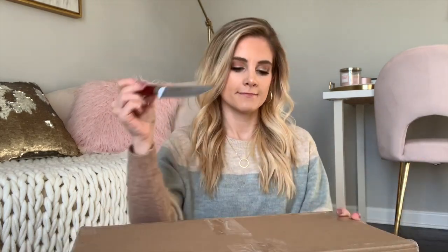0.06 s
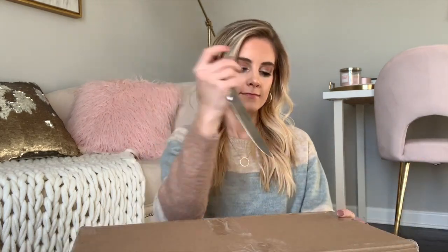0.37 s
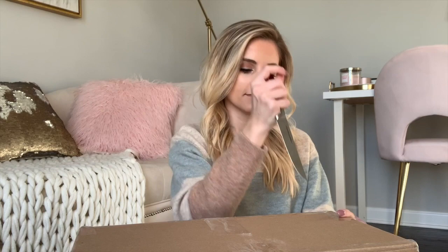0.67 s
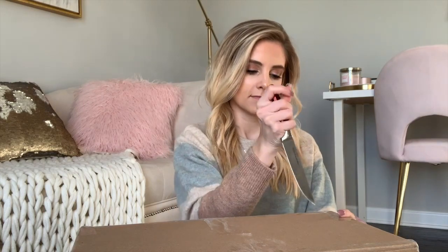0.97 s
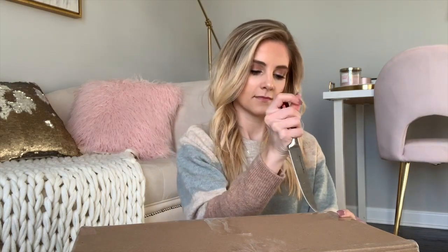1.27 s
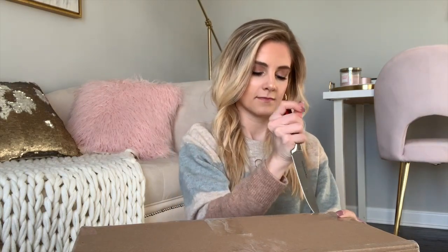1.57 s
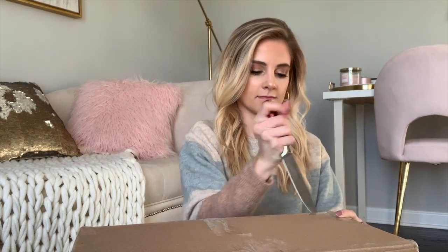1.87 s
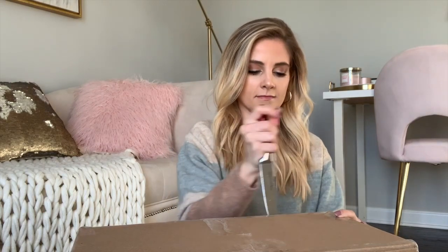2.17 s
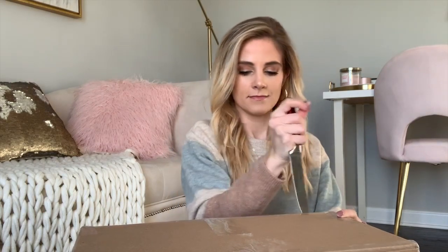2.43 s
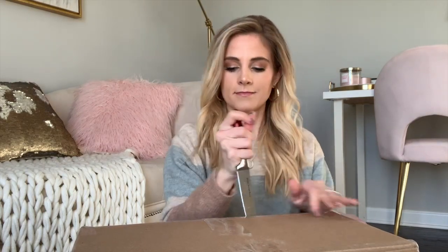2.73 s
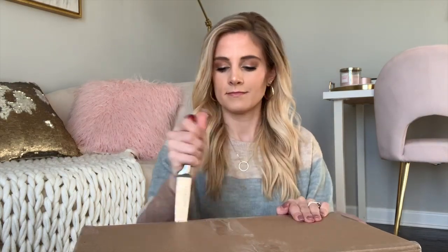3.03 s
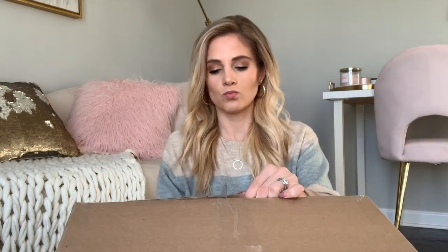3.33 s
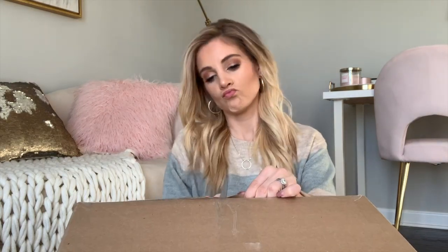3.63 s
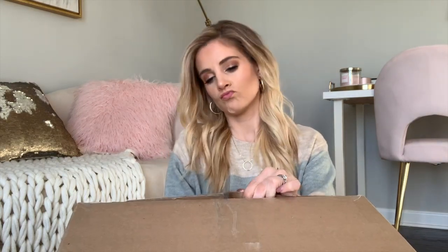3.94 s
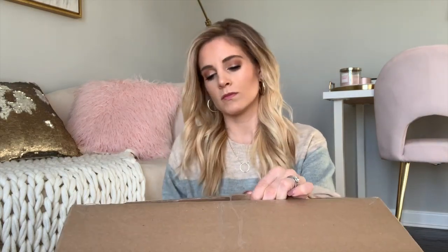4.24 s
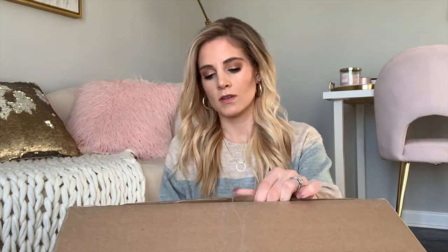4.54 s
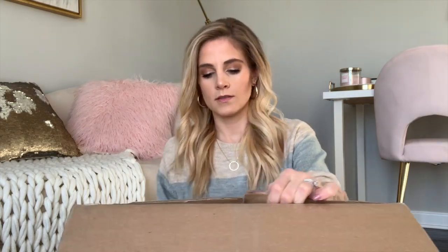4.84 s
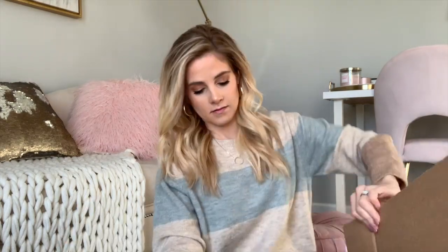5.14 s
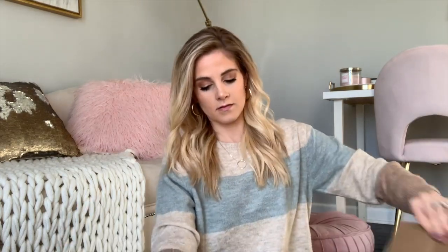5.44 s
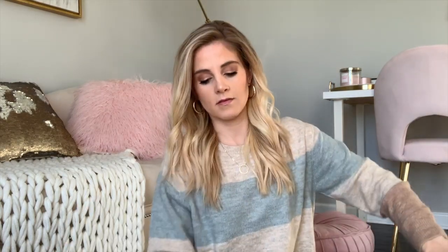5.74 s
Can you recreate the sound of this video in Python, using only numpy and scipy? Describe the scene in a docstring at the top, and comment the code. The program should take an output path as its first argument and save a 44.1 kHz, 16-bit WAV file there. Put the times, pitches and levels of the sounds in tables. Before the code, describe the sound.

Close up in a quiet room, a knife tip knocks irregularly on a hollow cardboard box and scratches at its tape. It punches in with a bright crack, and a moment later comes a loud double pop of tape and cardboard. Softer rubbing and hissing scrapes follow, until the box drops with a deep thump and is scraped aside. The house rumbles faintly underneath.

```python
"""A kitchen knife taps, stabs and slits the packing tape of a large cardboard box in a living room.
The box is tipped over, its flaps are rubbed and pulled, and it is dropped and shoved aside.
Blows send bending waves through the panels and ring the hollow box; tape and blade tip snap.
Each stroke is a shower of tiny slips that swells, holds and lifts. The house rumbles faintly."""
import sys
import numpy as np
from scipy import signal
from scipy.fft import rfft, irfft
from scipy.io import wavfile
from scipy.ndimage import uniform_filter1d, map_coordinates

SR = 44100
rng = np.random.default_rng(int(sys.argv[2]) if len(sys.argv) > 2 else 0)


def int16_out(signal):
    """Quantize to a 16-bit WAV file."""
    q = np.round(np.clip(np.atleast_2d(signal).T, -1, 1) * 32767)
    wavfile.write(sys.argv[1], SR, q.astype(np.int16))


N = 260228
TIME = np.arange(N) / SR

# friction spectra of board rasp, tape hiss and panel drumming: freq_hz, level_db
BOARD_RASP = [(200, -38.5), (450, -3.5), (620, 6), (780, 4), (950, 7), (1120, 4.5), (1650, 0.5),
              (2100, -3.5), (3000, -7), (4500, -2.5), (9000, -24)]
TAPE_HISS = [(1200, -40), (2200, -4.5), (3200, 4.5), (4200, 2), (5500, 2.5), (7500, 4), (9600, 4),
             (12000, -4.5), (15300, -2.5), (17000, -7.5)]
PANEL_DRUM = [(40, 2), (100, 7), (170, 3.5), (260, 2), (330, -2.5), (450, -3), (580, -11.5), (900, -36.5),
              (2500, -71.5)]


def gain_of(db):
    """dB to amplitude."""
    return 10 ** (np.asarray(db) / 20)


def unit_rms(x):
    """Scale to rms 1."""
    return x / np.sqrt(np.mean(x ** 2) + 1e-20)


def unit_energy(x):
    """Scale to energy 1."""
    return x / np.linalg.norm(x)


def curve_at(points, hz):
    """Interpolate over log frequency."""
    freq_hz, value = np.transpose(points)
    return np.interp(np.log(hz + 1), np.log(freq_hz + 1), value)


def add(mix, start_s, sound):
    """Mix in at start_s."""
    part = mix[max(round(start_s * SR), 0):][:len(sound)]
    part += sound[:len(part)]


def coloured(x, spectrum, size=2048):
    """Minimum-phase filter: nothing sounds ahead of a click."""
    log_gain = np.log(gain_of(curve_at(spectrum, abs(np.fft.fftfreq(size, 1 / SR)))))
    taps = np.fft.ifft(np.exp(np.conj(signal.hilbert(log_gain)))).real
    return signal.oaconvolve(x, taps[:size // 2])[:len(x)]


def resonate(x, hz, width_hz):
    """Two-pole resonance."""
    hz = min(hz, SR / 3)
    return signal.lfilter(*signal.iirpeak(hz, hz / min(width_hz, SR / 4), fs=SR), x)


def gesture(t, rise_s, hold_s, swell_db, fall_db_per_s, sag_db_per_s=14):
    """Contact envelope: swell, sagging hold, fall."""
    db = -swell_db * np.maximum(1 - t / rise_s, 0) - sag_db_per_s * np.clip(t - rise_s, 0, hold_s)
    return gain_of(db - fall_db_per_s * np.maximum(t - rise_s - hold_s, 0))


def slips(per_s, spread_db, smooth):
    """Friction: random slips of uneven size over a smooth rub."""
    sizes = gain_of(spread_db * np.minimum(rng.exponential(1, N), 4))
    clicks = sizes * rng.choice([-1, 1], N) * (rng.random(N) < per_s / SR)
    return unit_rms(unit_rms(clicks) + smooth * rng.standard_normal(N))


def board_echoes(x, size=512, places=7, decay_s=0.0027, echo_db=-1, dwell_s=0.06):
    """The contact moves from place to place; echoes in the board give each its own resonances."""
    t, out = np.arange(size) / SR, x.copy()
    for place in range(places):
        echoes = gain_of(echo_db) * unit_energy(rng.standard_normal(size) * np.exp(-t / decay_s))
        nearness = np.sin(np.pi / 2 * np.minimum((TIME / dwell_s - place) % places, 2))
        out += signal.oaconvolve(x * nearness, echoes)[:N]
    return out


def scraping(catch_db=1.5):
    """Slips rasp in the board, hiss on the tape and drum on the panels."""
    # blade or hand strokes: start_s, rise_s, hold_s, rasp_db, hiss_re_rasp_db, drum_re_rasp_db
    strokes = [(0.0, 0.01, 0.29, -69.5, 2, -0.5), (1.527, 0.0062, 0.044, -43, 3, 6.5),
               (1.733, 0.022, .015, -64, 0.5, -2), (1.857, 0.049, 0.14, -56, 1.5, 6),
               (1.976, 0.011, 0.0039, -35, 8.5, -3), (2.007, 0.021, 0.062, -46.5, -4, 0.5),
               (2.212, 0.036, 0.06, -44, 0.5, 4), (2.397, 0.0074, 0.013, -63.5, 6.5, 11.5),
               (2.546, 0.012, 0.12, -47.5, 0.5, 5), (2.73, 0.038, 0.0033, -47, -11, -8),
               (2.893, 0.0093, 0.033, -47.5, -8, -26), (2.961, 0.0096, 0.004, -37, 3, 8),
               (3.011, 0.012, 0.022, -34.5, 2.5, 8.5), (3.054, 0.0062, 0.075, -52.5, -1, 8.5),
               (3.133, 0.012, 0.15, -74.5, 13, 3), (3.386, .12, 0.16, -59.5, 2.5, 5),
               (3.799, 0.03, 0.037, -38, 5, 1.5), (3.872, 0.015, .13, -53.5, 0.5, 4),
               (4.034, 0.13, 0.058, -45.5, 2.5, 2.5), (4.207, 0.02, 0.14, -52, 1, 7.5),
               (4.41, 0.049, 0.047, -57, -1, 4.5), (4.597, 0.017, 0.14, -64, -25, 15),
               (4.746, 0.047, 0.067, -59, 1.5, 6.5), (4.933, 0.017, 0.0073, -59.5, 3.5, -12),
               (5.074, .018, 0.016, -35, -7.5, -10), (5.114, 0.023, 0.37, -49, 2, 1.5),
               (5.475, 0.042, 0.03, -49, 6, 0), (5.56, 0.011, 0.14, -42.5, -6, -0.5),
               (5.769, 0.058, 0.029, -37, -11, -6.5)]
    catches = unit_rms(uniform_filter1d(rng.standard_normal(N), size=300))
    drive = board_echoes(slips(per_s=2500, spread_db=1.0, smooth=0.5) * gain_of(catch_db * catches))
    levels, t = np.zeros((3, N)), np.arange(SR) / SR
    for start_s, rise_s, hold_s, rasp_db, hiss_db, drum_db in strokes:
        pressure = gain_of(rasp_db) * gesture(t, rise_s, hold_s, swell_db=17, fall_db_per_s=601.5)
        for level, db in zip(levels, (0, hiss_db, drum_db)):
            add(level, start_s, gain_of(db) * pressure)
    levels = uniform_filter1d(levels, size=150, axis=1)
    tape_drive = np.roll(drive, SR)  # the tape slips on its own
    layers = zip(levels, (drive, tape_drive, drive), (BOARD_RASP, TAPE_HISS, PANEL_DRUM))
    return sum(level * unit_rms(coloured(x, spectrum)) for level, x, spectrum in layers)


def diffuse_noise(size):
    """Noise at two close microphones, alike in the bass."""
    # left-right likeness: freq_hz, correlation
    likeness = [(100, 0.97), (300, 0.87), (600, 0.53), (1200, 0.075), (3000, 0.24), (15000, 0.14)]
    a, b = rfft(rng.standard_normal((2, size)))
    correlation = np.clip(curve_at(likeness, np.fft.rfftfreq(size, 1 / SR)), -1, 1)
    mid = np.sqrt((1 + correlation) / 2) * a
    side = np.sqrt((1 - correlation) / 2) * b
    return irfft([mid + side, mid - side], size)


def house_rumble(level_db=-50):
    """Low steady noise of the house."""
    # background spectrum: freq_hz, level_db
    spectrum = [(20, -4), (30, -1.5), (42, -4), (58, 2.5), (85, -2.5), (115, -5.5), (160, -15),
                (250, -28.5), (500, -41), (1000, -47.5), (3000, -55.5), (9000, -56.5), (16000, -57)]
    gain = gain_of(curve_at(spectrum, np.fft.rfftfreq(N, 1 / SR)))
    return gain_of(level_db) * unit_rms(irfft(rfft(diffuse_noise(N)) * gain, N))


def rubs(stage_q=2.6):
    """Slips feed one resonance of the blade or a flap as the contact swells and lets go."""
    # rubbing contacts: middle_s, length_s, peak_rms_db, pitch_hz
    contacts = [(0.154, 0.24, -74, 1390), (1.197, .018, -45.5, 747), (1.542, 0.078, -45, 1500),
                (1.561, 0.057, -49, 5000), (1.56, 0.081, -42, 8050), (2.027, 0.06, -67, 1480),
                (1.916, 0.14, -53.5, 7500), (2.275, .097, -42.5, 430), (2.766, 0.055, -48.5, 1330),
                (3.822, 0.032, -31, 870), (4.162, 0.24, -55, 4200), (4.173, 0.27, -46, 9600),
                (4.634, 0.052, -49.5, 1420), (4.823, .026, -50.5, 3230), (4.823, .042, -50.5, 1410),
                (5.097, .062, -41, 335), (5.655, 0.074, -37, 190), (5.833, 0.096, -41, 547),
                (5.853, .075, -37.5, 1400)]
    out, drive = np.zeros(N), slips(per_s=1500, spread_db=8.0, smooth=0.14)
    for middle_s, length_s, db, hz in contacts:
        size, width_hz = round(length_s * SR), hz / stage_q
        feed = drive[rng.integers(N - SR):][:size + 2000]
        tone = resonate(resonate(feed, hz, width_hz), hz, width_hz)[-size:]
        add(out, middle_s - length_s / 2, gain_of(db) * unit_rms(tone) * signal.windows.hann(size))
    return out


def fracture(decay_s, size=4096):
    """Tiny breaks in quick succession: a fading burst with a flat spectrum."""
    fade = np.exp(-np.arange(size) / SR / decay_s)
    spectrum = rfft(rng.standard_normal(size) * fade)
    return irfft(spectrum / (abs(spectrum) + 1e-9)) * np.sqrt(fade)


def snap(hz, crackle_per_s=700, crackle_decay_s=0.0032, crackle_db=-1.5):
    """A bright burst around hz, trailed by smaller fractures."""
    first = unit_energy(fracture(decay_s=0.0024))
    t = np.arange(len(first)) / SR
    crackle = rng.standard_normal(len(t)) * (rng.random(len(t)) < crackle_per_s / SR)
    drive = first + gain_of(crackle_db) * unit_energy(crackle * np.exp(-t / crackle_decay_s))
    width_hz = 1.45 * hz
    return unit_energy(resonate(resonate(drive, hz, width_hz), hz, width_hz))


def clinks_and_snaps(blade_hz=(11700, 12550, 13400), blade_t60_s=0.12, ring_db=-2):
    """The free blade clinks and its steel rings; tip and tape snap."""
    # blade clinks in the hand: start_s, level_db
    clinks = [(0.101, -29.5), (0.1647, -25.5)]
    # tip and tape snaps: start_s, level_db, centre_hz
    snaps = [(0.83, -40, 3200), (0.8544, -24.5, 7000), (0.907, -31.5, 9000), (0.922, -33.5, 11000),
             (1.203, -12, 5600), (1.5212, -10, 5000), (1.9356, -19.5, 6700), (2.644, -24, 7860),
             (2.77, -30.5, 2800), (2.883, -14, 11000), (3.028, -3.5, 11000), (3.032, -0.5, 3260),
             (3.231, -26.5, 6100), (3.535, -23.5, 7000), (3.815, 0.5, 8000), (3.86, -1.5, 6000),
             (3.971, -18.5, 4500), (4.814, -24, 3120), (4.965, -22, 7800), (5.32, -17, 9000),
             (5.563, -5, 6400)]
    out, t = np.zeros(N), np.arange(SR // 4) / SR
    partials = sum(np.sin(2 * np.pi * hz * t) for hz in blade_hz)
    ring = unit_energy(partials * gain_of(-60 * t / blade_t60_s))
    for start_s, db, hz in snaps:
        add(out, start_s, gain_of(db) * snap(hz))
    for start_s, db in clinks:
        add(out, start_s, gain_of(db) * snap(hz=11600))
        add(out, start_s, gain_of(db + ring_db) * ring)
    return out


def bending_wave(centre_hz, travel_s, q=2.9, top_ratio=2.53, size=16384):
    """Treble crosses the board faster than bass: a short falling chirp."""
    ratio = (np.fft.rfftfreq(size, 1 / SR) + 1) / centre_hz
    band = 1 / (1 + 1j * q * (ratio - 1 / ratio)) / (1 + 1j * ratio / top_ratio) ** 2
    dispersion = np.exp(-2j * np.pi * centre_hz * travel_s * 2 * np.sqrt(ratio))
    return unit_energy(irfft(band * dispersion)) * signal.windows.hann(2 * size)[size:]


def ringing(modes, t, build_s):
    """Modes build as the wave returns from the edges, then decay."""
    ring = sum(gain_of(db - 60 * t / t60_s) * np.sin(2 * np.pi * (hz * t + rng.random()))
               for hz, db, t60_s in modes)
    return unit_energy(ring * (1 - np.exp(-(t / build_s) ** 2)))


def knocks(dent_s=0.0099, dent_db=-26, crack_db_per_octave=4.5):
    """Each blow dents the liner, crushes a few flutes, bends the panel and rings the box."""
    # blows: start_s, wave_db, centre_hz, ring_db, thud_db
    blows = [(0.853, -4, 160, -12.5, -1), (1.2005, -12.5, 172, -17, -8.5), (1.5217, -7.5, 470, -22, -3),
             (1.862, -29, 730, -29, -46), (1.9838, -4.5, 200, -14, -13), (2.498, -39, 500, -25, -44),
             (2.883, -6.5, 1050, -4, -3.5), (3.03, -1, 895, -17, -7), (3.345, -27, 278, -50, -28),
             (3.4314, -52, 726, -38, -44), (3.815, 1.5, 880, -17, 0), (3.8186, 13.5, 294, 8, -11),
             (3.857, -1.5, 300, -3.5, -6), (3.972, -23, 590, -18, -30), (4.4584, -25, 860, -33, -39),
             (4.6219, -18, 920, -13.5, -39), (5.081, -11, 325, -11, -3), (5.5556, 16.5, 165, -32, 10.5),
             (5.56, 16, 88, -33, 5.5)]
    # modes of the panels, and of the air inside and floor below: pitch_hz, level_db, t60_s
    panel_modes = [(101, -4, 0.079), (167.6, -4.5, 0.028), (258.6, -1.5, 0.08), (327, -4.5, 0.081),
                   (424.3, -7, 0.13), (580, -9.5, 0.088), (950, -20, 0.094), (1046, -27.5, 0.31)]
    thud_modes = [(38.5, -3.5, 0.44), (61.7, -2, 0.5), (83, -9.5, 0.44), (107.6, 0.5, .27),
                  (170, -35.5, .25)]
    # spectra of cracking flutes and denting liner: freq_hz, level_db
    crack_spectrum = [(80, -49), (400, 14.5), (950, 2), (1500, -3.5), (2200, -6.5), (4500, -7.5),
                      (9000, -15.5), (16000, -47.5)]
    dent_spectrum = [(150, -30), (500, -3.5), (1500, 3.5), (5000, 1), (9000, -37), (16000, -52)]
    out, dent_size = np.zeros(N), round(dent_s * SR)
    for start_s, wave_db, centre_hz, ring_db, thud_db in blows:
        hardness = centre_hz / 297.5  # harder blows travel faster and crack more
        wave = bending_wave(centre_hz, travel_s=0.005913 / hardness ** 0.597)
        t = np.arange(len(wave)) / SR
        ring = gain_of(ring_db) * ringing(panel_modes, t, build_s=0.0027)
        thud = gain_of(thud_db) * ringing(thud_modes, t, build_s=0.013)
        add(out, start_s, gain_of(wave_db) * wave + ring + thud)
        crack_db = wave_db - 9.5 + crack_db_per_octave * np.log2(hardness)
        crack = coloured(fracture(decay_s=0.0099), crack_spectrum)
        add(out, start_s, gain_of(crack_db) * unit_energy(crack))
        crunch = coloured(rng.standard_normal(len(t)), dent_spectrum)[-dent_size:]
        crunch *= np.linspace(0, 1, dent_size)
        add(out, start_s - dent_s, gain_of(wave_db + dent_db) * unit_energy(crunch))
    return out


def rustle():
    """Sparse, uneven slips of resting fingers and blade."""
    # rustle contour: time_s, level_db
    contour = [(1.5, -100), (2.0, -69.5), (3.3, -72), (4.4, -69), (5.0, -72), (5.9, -63)]
    drive = slips(per_s=800, spread_db=9.0, smooth=0.83)
    layers = sum(gain_of(db) * unit_rms(coloured(drive, spectrum))
                 for db, spectrum in ((0, BOARD_RASP), (0, TAPE_HISS), (3, PANEL_DRUM)))
    return gain_of(np.interp(TIME, *np.transpose(contour))) * layers


def judder(groan_hz=309, waver=0.036, swell_db=16):
    """The blade sticks and slips at the lid's lowest mode, then tears on and excites the upper ones."""
    # judders in the slit: start_s, rise_s, groan_db, upper_db
    judders = [(2.965, 0.029, -18, -38.5), (3.024, .01, -24.5, -23)]
    # upper lid modes: pitch_hz, width_hz, relative_db
    lid_modes = [(534, 37, 6.5), (876, 24.5, 0.5), (1015, 24, 0.5), (1107, 50, -4), (1653, 27, 4),
                 (2850, 67, -3.5)]
    out, t = np.zeros(N), np.arange(SR // 6) / SR
    shares = unit_energy(gain_of([db for _, _, db in lid_modes]))
    for start_s, rise_s, groan_db, upper_db in judders:
        drift = unit_rms(uniform_filter1d(rng.standard_normal(len(t)), size=300))
        groan = unit_rms(np.sin(2 * np.pi * np.cumsum(groan_hz * (1 + waver * drift)) / SR))
        envelope = gesture(t, rise_s, 0, swell_db, fall_db_per_s=752)
        add(out, start_s, gain_of(groan_db) * groan * envelope)
        tearing = rng.standard_normal(2 * len(t))
        for (hz, width_hz, _), share in zip(lid_modes, shares):
            envelope = gesture(t, rise_s, 0, swell_db, fall_db_per_s=480 * width_hz / 40.3)
            mode = unit_rms(resonate(tearing, hz, width_hz)[-len(t):])
            add(out, start_s, gain_of(upper_db) * share * envelope * mode)
    return out


def direct_sound(x, treble_hz=8940, hz_per_turn=2160):
    """The nearer microphone hears first; the top treble is out of phase at any bearing."""
    # bearing of the contact: time_s, left_lead_ms
    bearing = [(0, -0.042), (1.2, -0.046), (2.0, -0.02), (2.88, 0), (2.98, 0.063), (4.6, 0.057),
               (5.3, -0.069), (5.9, -0.15)]
    hz, spectrum = np.fft.rfftfreq(N, 1 / SR), rfft(x)
    treble_share = np.clip((hz - treble_hz) / 1000 + 1, 0, 1)
    turn = np.exp(1j * np.pi * (hz - treble_hz) / hz_per_turn)
    lead_samples = np.interp(TIME, *np.transpose(bearing)) * SR / 1000
    lower = irfft(spectrum * (1 - treble_share), N)
    shifted = [map_coordinates(lower, [np.arange(N) + side * lead_samples / 2], order=3)
               for side in (1, -1)]
    return np.array(shifted) + irfft(spectrum * treble_share * np.array([turn, 1 / turn]), N)


def room(x, build_s=0.0063):
    """Reflections from walls and furniture build up and decay band by band."""
    # room decay: freq_hz, t60_s
    decay = [(100, 0.11), (400, 0.38), (1000, 0.32), (3000, 0.38), (8000, 0.27), (15000, 0.21)]
    # reflection level: freq_hz, level_re_direct_db
    wet = [(60, -33), (170, -4), (400, -5.5), (1000, -1.5), (4000, -9), (15000, -10)]
    hz, t, bands = signal.stft(diffuse_noise(SR // 2), SR, nperseg=256)
    bands *= gain_of(-60 * t / curve_at(decay, hz)[:, None])
    bands *= 1 - np.exp(-(t / build_s) ** 2)
    bands /= np.sqrt((abs(bands) ** 2).sum(2, keepdims=True).mean(0))  # equal energy per band
    tails = signal.istft(bands, SR, nperseg=256)[1]
    return np.array([signal.fftconvolve(coloured(x, wet), unit_energy(tail))[:N] for tail in tails])


def scene(echo_cut_s=3.149):
    """Knife and box in the quiet room; the stab's echo stops abruptly."""
    box = scraping() + knocks() + clinks_and_snaps() + judder() + rubs() + rustle()
    before_cut = np.clip((echo_cut_s - TIME) / 0.002, 0, 1)
    reflections = before_cut * room(box * before_cut) + room(box * (1 - before_cut))
    return direct_sound(box) + reflections + house_rumble()


def record(dry, cutoff_hz=16200):
    """Two microphones of slightly different colour, then a low-pass."""
    # channel balance: freq_hz, left_minus_right_db
    balance = [(100, 0.5), (300, 0.5), (1000, 2), (2500, 2.5), (5000, 0.5), (8000, -2), (14000, 0.5)]
    lean = gain_of(curve_at(balance, np.fft.rfftfreq(N, 1 / SR)) / 2)
    heard = irfft(rfft(dry) * np.array([lean, 1 / lean]), N)
    taps = signal.firwin(255, cutoff_hz, window=("kaiser", 9), fs=SR)
    return signal.oaconvolve(heard, taps[None], "same")


dry = scene()
out = record(dry)
int16_out(out)
```